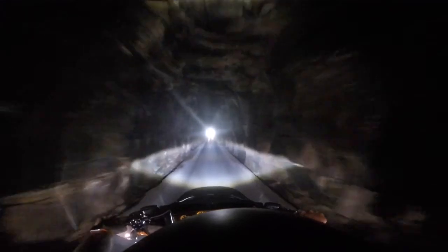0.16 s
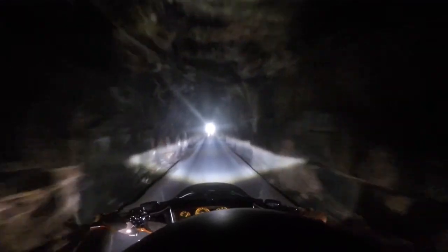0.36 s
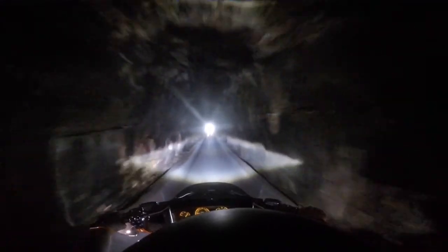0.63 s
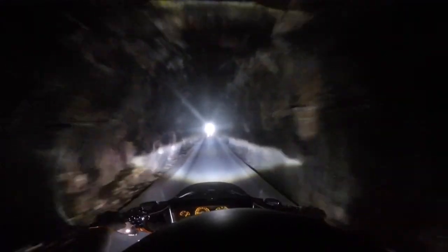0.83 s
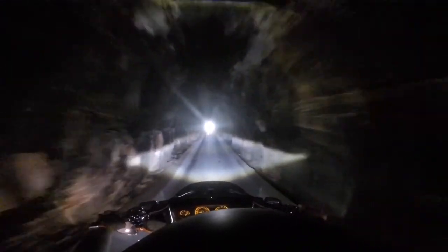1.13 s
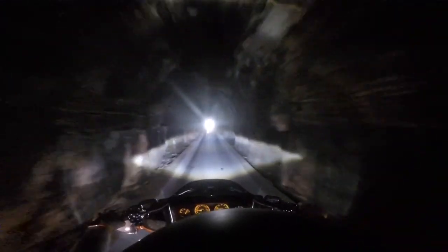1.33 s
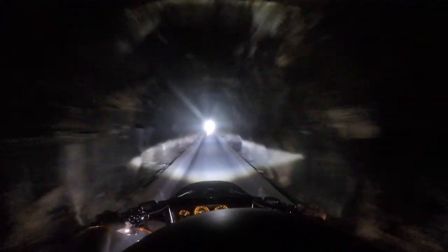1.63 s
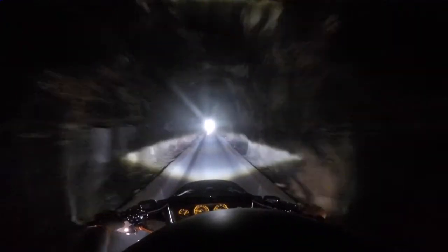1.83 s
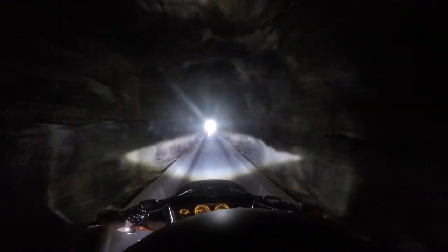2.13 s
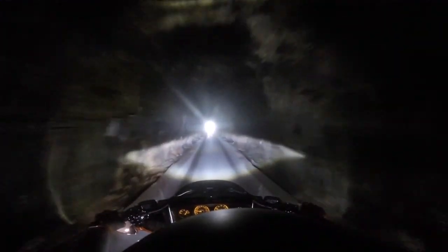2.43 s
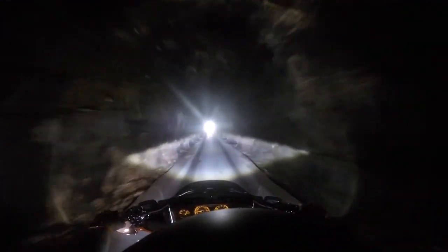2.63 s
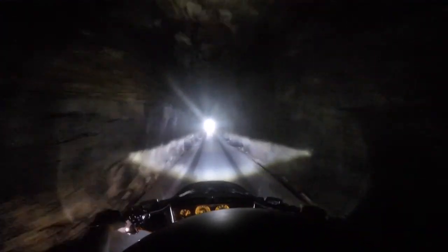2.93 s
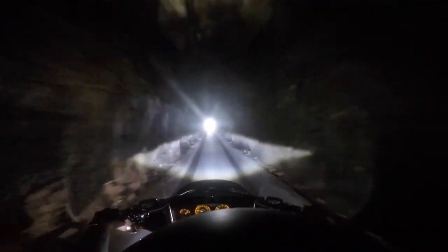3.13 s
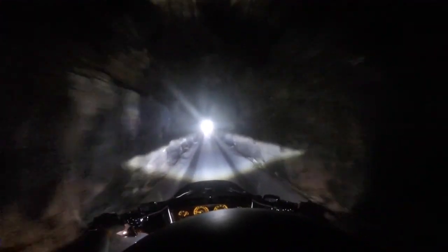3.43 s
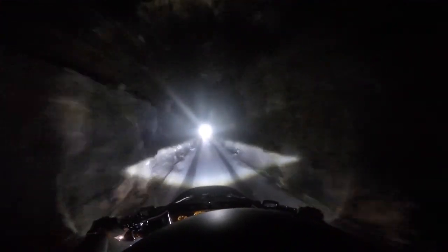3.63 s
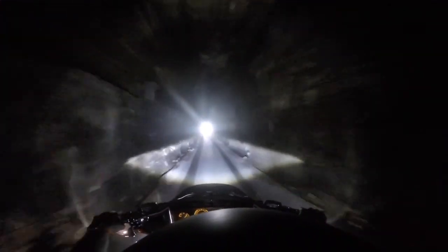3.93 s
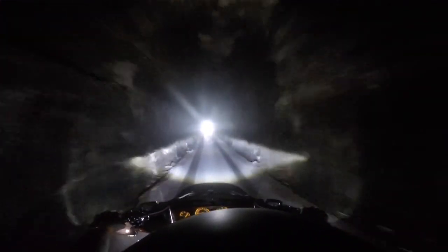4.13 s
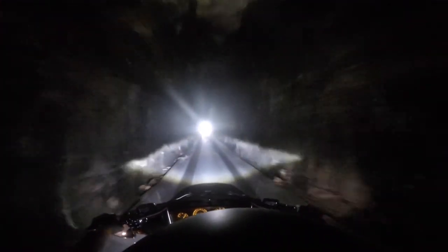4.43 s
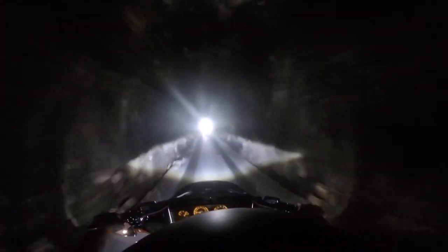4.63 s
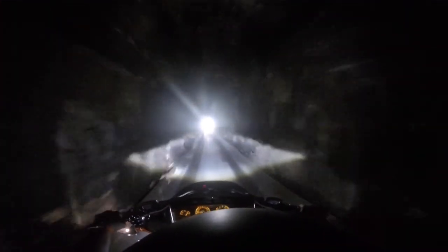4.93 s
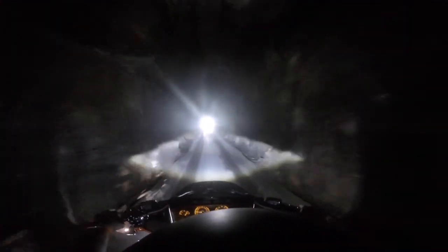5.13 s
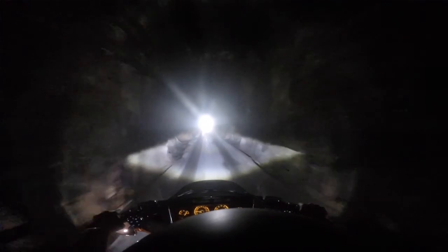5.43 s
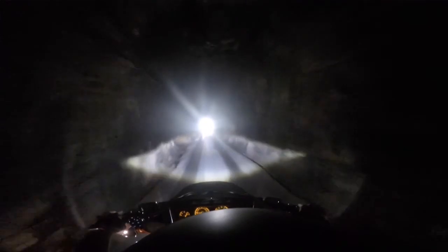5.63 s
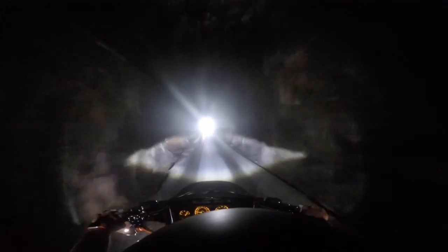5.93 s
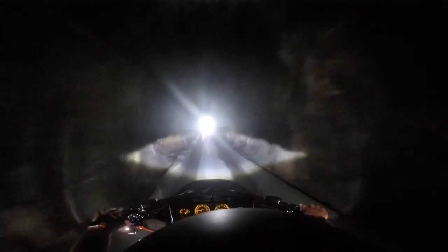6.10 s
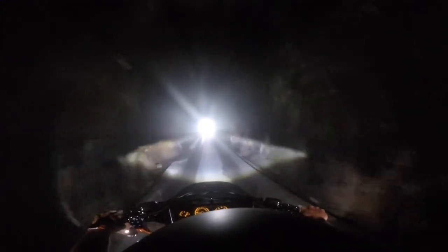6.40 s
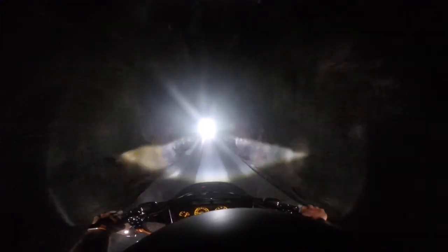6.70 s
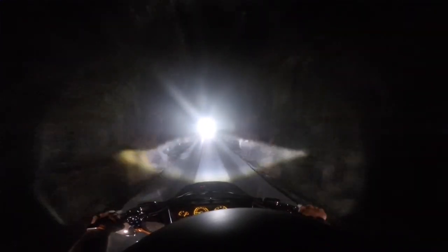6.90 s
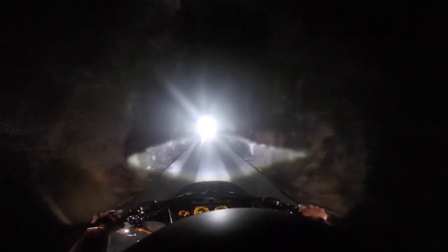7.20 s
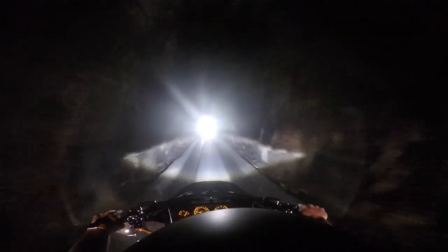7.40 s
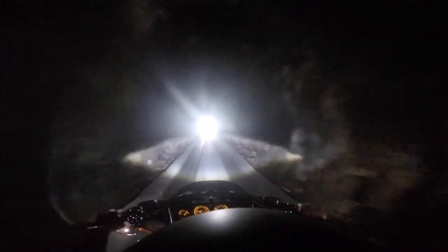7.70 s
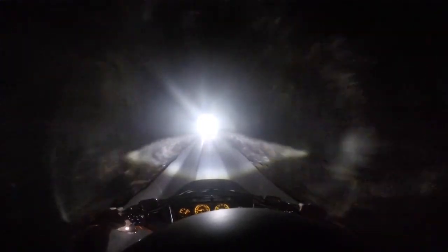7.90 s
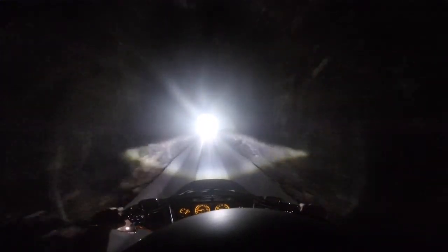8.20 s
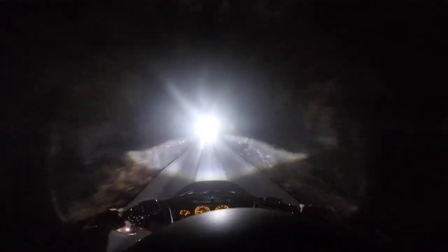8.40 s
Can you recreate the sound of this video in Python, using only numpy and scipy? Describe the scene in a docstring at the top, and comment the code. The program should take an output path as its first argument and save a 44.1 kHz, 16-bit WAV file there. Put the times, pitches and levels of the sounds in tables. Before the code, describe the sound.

A motorcycle cruises at low revs through a rock tunnel, its exhaust echoing and booming over wind rumble and tyre hiss.

```python
"""A twin-cylinder motorcycle cruises at low revs through a narrow rock tunnel, heard from the saddle.
Echoes off the walls swell and swallow single exhaust notes; wind on the microphone and echoes rumble.
The valve gear rustles and the air intake hums over rushing air and tyre hiss.
Midway the tyres swish through a wet stretch.
Near the end the tunnel gives its loudest boom, followed by a short bright rattle."""
import sys
import numpy as np
from scipy import signal
from scipy.fft import rfft, irfft
from scipy.io import wavfile

SR = 44100
rng = np.random.default_rng(int(sys.argv[2]) if len(sys.argv) > 2 else 0)


def wrap_up_sound(samples):
    """Save the sound to the file named by the first command line argument, as 16-bit audio."""
    columns = np.atleast_2d(samples).T
    # keep every value between -1 and 1, then stretch to whole-number steps
    tamed = np.clip(columns, -1, 1)
    steps = np.round(tamed * 32767).astype(np.int16)
    wavfile.write(sys.argv[1], SR, steps)


N = 377055
TIME = np.arange(N) / SR

# Engine speed. Each row: time in seconds, cycles per second (a cycle is two turns of the engine).
ENGINE_SPEED = [(0, 12.1), (.5, 13.7), (.9, 12.3), (1.5, 15.05), (2, 13.9), (2.4, 13.4), (3.3, 14.1),
                (3.6, 13.1), (4.1, 15.2), (5.3, 13.5), (5.8, 13.55), (6.8, 13.6), (7.5, 14.45), (7.9, 13.8),
                (8.55, 15.1)]
# Exhaust notes. Each row: multiple of the cycle rate, relative level in dB.
EXHAUST_NOTES = [(2, -38), (3, -38), (4, -40.5), (5, -34.5), (6, -35.5), (7, -31.5), (8, -38.5), (9, -33.5),
                 (10, -35), (11, -41.5), (12, -47.5), (13, -38), (14, -46), (15, -42), (16, -46), (17, -42),
                 (18, -46), (19, -42.5), (20, -42)]
# Tunnel booms. Each row: peak time in seconds, multiple of the cycle rate, relative peak in dB,
# half length in seconds.
TUNNEL_BOOMS = [(.2, 9, -24, 0.27), (.7, 5, -30, 0.21), (1.05, 7, -28, 0.14), (1.153, 10, -25, 0.21),
                (1.297, 6, -27.5, .12), (2.08, 10, -26, .15), (2.421, 9, -21.5, 0.077), (3.01, 8, -20, 0.1),
                (3.2, 7, -25, 0.31), (3.665, 9, -17.5, 0.12), (3.9, 3, -29, .4), (4.102, 5, -26, 0.15),
                (4.62, 7, -25, .22), (5.58, 7, -25.5, 0.094), (5.91, 10, -30.5, .13),
                (6.403, 5, -29.5, 0.086), (7.099, 9, -23.5, .09), (7.458, 5, -12, .155),
                (7.92, 9, -23.5, 0.077), (8.35, 8, -25, 0.14), (8.4, 5, -22.5, 0.13)]
# The tone colours of five noises. Each row: frequency in Hz, relative level in dB.
RUMBLE_COLOUR = [(12, -15), (28, -14), (42, -5.5), (60, -4), (85, -1), (125, -1), (150, -5), (190, -28)]
DRONE_COLOUR = [(110, 2), (160, 0.5), (230, -1.5), (280, 2), (305, -8), (340, -14.5), (385, -17),
                (450, -33)]
AIR_COLOUR = [(250, -1.5), (400, 0), (620, -1.5), (800, -2), (1200, -3), (1600, 1.5), (1950, -7.5),
              (3100, -3), (3900, -17), (6500, -19), (8000, -38)]
HISS_COLOUR = [(1000, -24.5), (1500, 2), (1950, -1), (2200, 3.5), (2600, -1), (3050, 1), (3400, -7),
               (3600, 1.5), (3900, -11), (4700, -6.5), (5200, -8), (6400, -8.5), (7200, -16), (8200, -30)]
SIZZLE_COLOUR = [(7500, -4), (8400, -5), (9100, 1), (10400, -3.5), (10900, -6), (11900, -6.5), (12500, -11),
                 (13700, -11), (14400, -20), (15200, -15)]
# How four sounds rise and fall. Each row: time in seconds, relative level in dB.
RUMBLE_CURVE = [(0, -26), (.6, -30.5), (1.3, -32.5), (1.8, -32), (2.3, -31), (3.3, -29), (4.1, -29.5),
                (4.9, -30.5), (5.4, -30), (5.95, -33.5), (7.9, -34), (8.55, -30.5)]  # low rumble of wind on the microphone and tunnel echoes
DRONE_CURVE = [(0, -31), (1.2, -26.5), (1.6, -31), (1.85, -25.5), (2.6, -21), (3.3, -27), (4.2, -27.3),
               (5.25, -29.5), (5.55, -27.5), (5.9, -32), (6.5, -27.5), (8.55, -26)]  # the tunnel's ringing above it
HISS_CURVE = [(0, -45.5), (1.3, -43.5), (3.3, -43), (5.2, -44.5), (6.5, -44.5), (8.55, -43)]
INTAKE_CURVE = [(0, -49.5), (2.5, -48), (3.15, -40), (4.4, -45), (4.8, -41), (5.5, -47), (5.95, -45),
                (6.4, -57), (7, -46), (8.55, -47)]
# The engine casing's rings. Each row: pitch in Hz, width in Hz, weight in dB, extra dB per dB of rattle.
CASING_RINGS = [(1532, 282, 0, 4), (1720, 350, -3.5, 4.5), (2060, 230, -19, 3), (3000, 390, -7.5, 4)]
# Spells of harder valve rattle. Each row: start in seconds, end in seconds, lift in dB.
RATTLE_SPELLS = [(.27, 0.327, 7), (0.474, .53, 4), (.62, .9, 2.5), (2.07, 2.233, 7.5), (2.39, 2.5, 10),
                 (2.696, 4.42, 5.5), (3.73, 3.755, 7), (4.2, 4.32, 2), (4.9, 5.031, 3), (5.247, 5.327, 8),
                 (5.4, 5.49, 4), (6.527, 7.026, 5), (7.56, 7.7, 8), (7.757, 7.86, 3.5), (8.052, 8.188, 9.5),
                 (8.275, 8.463, 7)]
# Tyre splashes and, in the last row, a short bright rattle.
# Each row: peak time in seconds, relative peak in dB, pitch in Hz, half length in seconds.
SPLASHES_AND_RATTLE = [(2.083, -31, 1000, 0.03), (2.43, -32.5, 910, 0.086), (2.722, -32, 3490, 0.016),
                       (2.82, -29.5, 1050, 0.025), (2.83, -30, 2700, 0.014), (3.04, -39, 2950, 0.024),
                       (3.185, -37, 699, 0.017), (3.32, -28, 2702, 0.0096), (3.49, -32, 2800, 0.018),
                       (4.207, -32, 1112, .012), (4.36, -31, 600, 0.011), (4.489, -27, 1370, 0.01),
                       (4.937, -31, 1350, 0.01), (7.585, -34, 2680, 0.026)]
# Bands the camera housing weakens. Each row: frequency in Hz, width in Hz, share cancelled.
HOUSING_DIPS = [(3500, 100, 0.3), (5080, 150, 0.24), (6530, 150, .28)]
# Faint tones of the camera's electronics. Each row: pitch in Hz, level in dB.
WHINE_TONES = [(8780, -79), (11719, -82), (14626, -93)]


def from_db(db):
    """Turn decibels into a gain."""
    return 10 ** (np.asarray(db) / 20)


def rms_one(x):
    """Scale a signal to an average power of 1."""
    return x / np.sqrt(np.mean(np.abs(x) ** 2) + 1e-20)


def curve(rows):
    """Join (time, value) points with straight lines."""
    return np.interp(TIME, *np.transpose(rows))


def drift(rate_hz):
    """A smooth random wobble, about 1 in size."""
    step, settle = 40, 2000
    pole = np.exp(-2 * np.pi * rate_hz * step / SR)
    white = rng.standard_normal(N // step + settle + 2)
    slow = signal.lfilter([1], [1, -2 * pole, pole * pole], white)[settle:]
    return np.interp(np.arange(N) / step, np.arange(len(slow)), rms_one(slow))


def noise(colour):
    """Noise of a given colour, falling 36 dB an octave past the ends of its table."""
    hz, db = np.transpose(colour)
    octave = np.log2(np.maximum(np.arange(N // 2 + 1) * SR / N, 1))
    points = np.log2(hz)
    outside = np.abs(octave - np.clip(octave, points[0], points[-1]))
    shape = from_db(np.interp(octave, points, db) - 36 * outside)
    return rms_one(irfft(rfft(rng.standard_normal(N)) * shape, N))


def resonance(x, hz, width_hz):
    """Let through a band around one pitch."""
    r = np.exp(-np.pi * width_hz / SR)
    feedback = [1, -2 * r * np.cos(2 * np.pi * hz / SR), r * r]
    return signal.lfilter(np.array([1, 0, -1]) * (1 - r * r) / 2, feedback, x)


def ring(x, hz, width_hz):
    """The same resonance twice over, scaled to power 1."""
    return rms_one(resonance(resonance(x, hz, width_hz), hz, width_hz))


def swell(peak_s, half_length_s):
    """A bell-shaped rise and fall of height 1."""
    return np.exp(-.5 * ((TIME - peak_s) / half_length_s) ** 2)


def held(start_s, end_s, attack_s, release_s):
    """Rise, hold at up to 1, then fall; each ramp is centred on its time."""
    return np.clip(.5 + np.minimum((TIME - start_s) / attack_s, (end_s - TIME) / release_s), 0, 1)


def firing(cycles, sharpness):
    """Two bumps a cycle, unevenly spaced like the firings of the two cylinders."""
    bumps = [np.exp(sharpness * (np.cos(2 * np.pi * (cycles - at)) - 1)) for at in (0, 315 / 720)]
    return rms_one(sum(bumps))


def air_and_spray(dry_db=-39.5, wet_start_s=2.04, wet_end_s=4.74):
    """Air and spray rush past, louder and more ragged on the wet stretch."""
    water_db = 5 - 0.4 * (TIME - wet_start_s)  # the water slowly thins
    level_db = dry_db + water_db * held(wet_start_s, wet_end_s, attack_s=.05, release_s=1)
    flutter_db = 1.13 + 0.2 * np.maximum(level_db - np.median(level_db), 0)
    return from_db(level_db + flutter_db * drift(32)) * noise(AIR_COLOUR)


def tyres():
    """Tyres hiss smoothly on the road, with a faint sizzle on top."""
    gain = from_db(curve(HISS_CURVE) + .5 * drift(13))
    return gain * (from_db(7) * noise(HISS_COLOUR) + from_db(-16) * noise(SIZZLE_COLOUR))


def splashes_and_rattle(trim_db=-4.5, top_hz=4600):
    """Bursts of noise: swishes of spray from wet patches, then a short bright rattle near the end."""
    out = np.zeros(N)
    for peak_s, db, hz, half_length_s in SPLASHES_AND_RATTLE:
        band = ring(rng.standard_normal(N), hz, width_hz=0.59 * hz)
        out += from_db(db + trim_db) * band * swell(peak_s, half_length_s)
    return signal.sosfilt(signal.butter(4, top_hz, fs=SR, output="sos"), out + 1e-18)


def intake(trim_db=-4.5):
    """Air drawn through the hollow air box makes it hum."""
    hum = ring(rng.standard_normal(N), hz=600, width_hz=62)
    return from_db(curve(INTAKE_CURVE) + trim_db) * hum


def valve_gear(cycles, quiet_db=-42.5):
    """Many tiny, uneven taps ring the engine casing; hard spells bring out its second ring."""
    spells_db = sum(db * held(start, end, attack_s=0.024, release_s=0.1)
                    for start, end, db in RATTLE_SPELLS)
    level_db = quiet_db + spells_db + .9 * drift(3.5)
    taps = rng.standard_normal(N) * from_db(2.1 * drift(60))
    taps *= 1 + 0.14 * firing(2 * cycles, sharpness=2.8)  # bunched twice per engine turn
    rattle_db = level_db - np.median(level_db)
    rings = np.array([ring(taps, hz, width) for hz, width, _, _ in CASING_RINGS])
    weights = np.array([from_db(db + growth * rattle_db) for _, _, db, growth in CASING_RINGS])
    return from_db(level_db) * np.sum(weights * rings, axis=0) / np.linalg.norm(weights, axis=0)


def wind_and_echoes(cycles, rumble_db, drone_db):
    """Wind on the microphone and tunnel echoes rumble; above that the echoes drone and throb a little."""
    throb = rms_one(1 + 0.14 * firing(cycles, sharpness=7.5))
    rumble = from_db(rumble_db + 6.5) * noise(RUMBLE_COLOUR)
    drone = from_db(drone_db - 2.5) * noise(DRONE_COLOUR)
    return rumble + drone * throb


def booms(cycles, trim_db=0.5):
    """One exhaust note swells as the motorcycle rides through a standing wave, where echoes pile up."""
    out = np.zeros(N)
    path_phase = 0.26 * drift(7.3) + 0.87 * drift(0.63)  # the echo paths lengthen and shorten
    for peak_s, multiple, db, half_length_s in TUNNEL_BOOMS:
        note = np.cos(2 * np.pi * (multiple * cycles + rng.random()) + path_phase)
        out += from_db(db + trim_db) * swell(peak_s, half_length_s) * note
    return np.sqrt(2) * out


def exhaust(cycles, rumble_db, drone_db, fade_hz=2.07, silencer_hz=288, split_hz=145):
    """Exhaust notes echo off the walls, swelling and fading as the rock slides past."""
    out = np.zeros(N)
    speed = curve(ENGINE_SPEED)
    for multiple, db in EXHAUST_NOTES:
        # Low notes rise and fall with the rumble, higher ones with the drone.
        follow_db = rumble_db if multiple * speed.mean() < split_hz else drone_db
        gain = from_db(db + 0.84 * (follow_db - np.median(follow_db)))
        gain /= np.hypot(1, (multiple * speed / silencer_hz) ** 20)  # the silencer dulls the top notes
        echoes = rms_one(drift(fade_hz) + 1j * drift(fade_hz))  # wandering strength and phase
        note = np.exp(2j * np.pi * (multiple * cycles + rng.random()))
        out += gain * np.real(note * echoes)
    return np.sqrt(2) * out


def scene():
    """Add everything in one channel; the engine's speed sets its notes and its beat."""
    cycles = np.cumsum(curve(ENGINE_SPEED)) / SR  # engine cycles so far
    rumble_db, drone_db = curve(RUMBLE_CURVE), curve(DRONE_CURVE)
    mix = exhaust(cycles, rumble_db, drone_db) + booms(cycles)
    mix += wind_and_echoes(cycles, rumble_db, drone_db)
    mix += valve_gear(cycles) + intake()
    mix += air_and_spray() + tyres() + splashes_and_rattle()
    return mix[None]


def record(dry, top_hz=15200):
    """The camera colours the sound, adds a faint whine, softens both ends and cuts the highest treble."""
    for hz, width_hz, share in HOUSING_DIPS:
        dry = dry - share * resonance(dry, hz, width_hz)
    whine = sum(np.sqrt(2) * from_db(db) * np.sin(2 * np.pi * hz * TIME) for hz, db in WHINE_TONES)
    fade = np.clip(np.minimum(TIME, TIME[-1] - TIME) / .004, 0, 1)
    treble_cut = signal.ellip(10, .1, 80, top_hz, fs=SR, output="sos")
    return signal.sosfilt(treble_cut, fade * (dry + whine))


dry = scene()
out = record(dry)
wrap_up_sound(out)
```